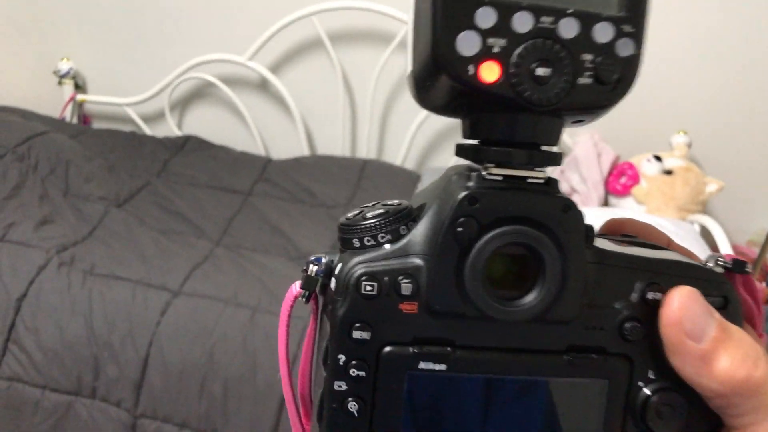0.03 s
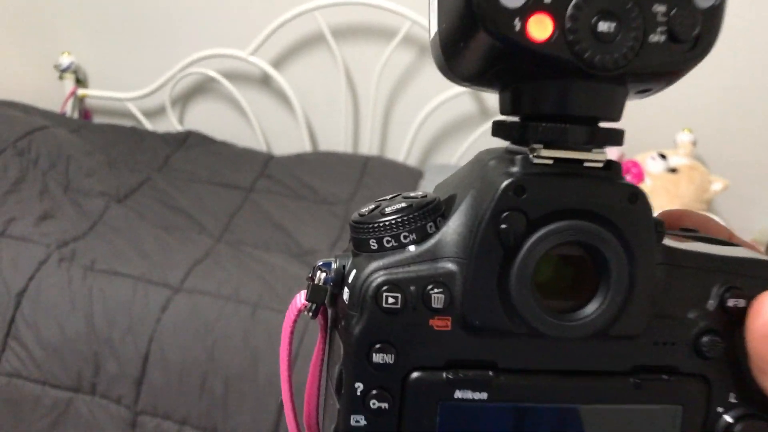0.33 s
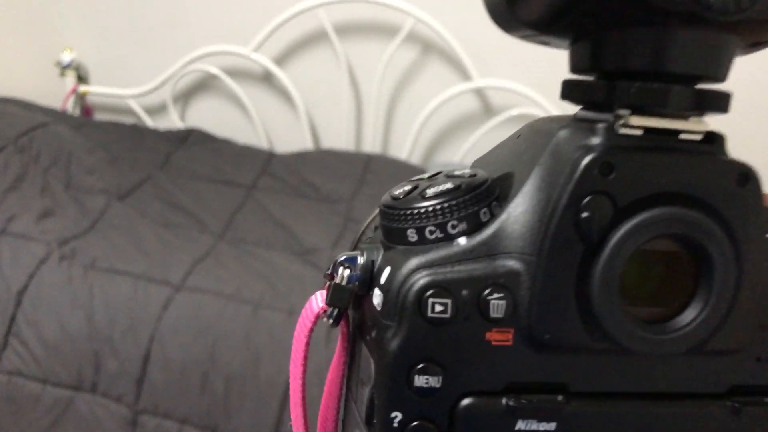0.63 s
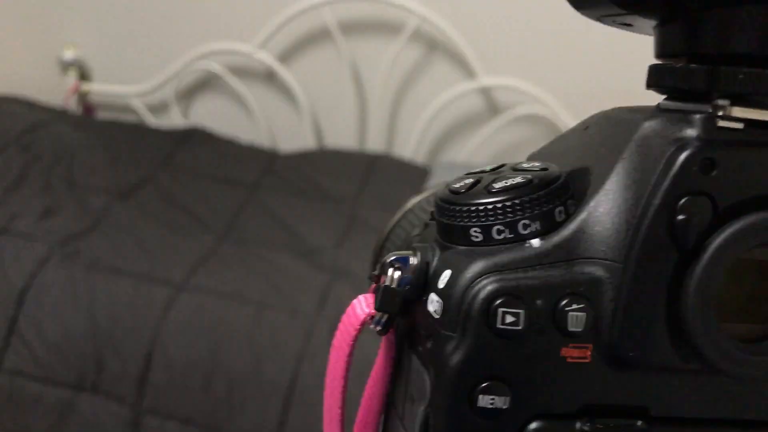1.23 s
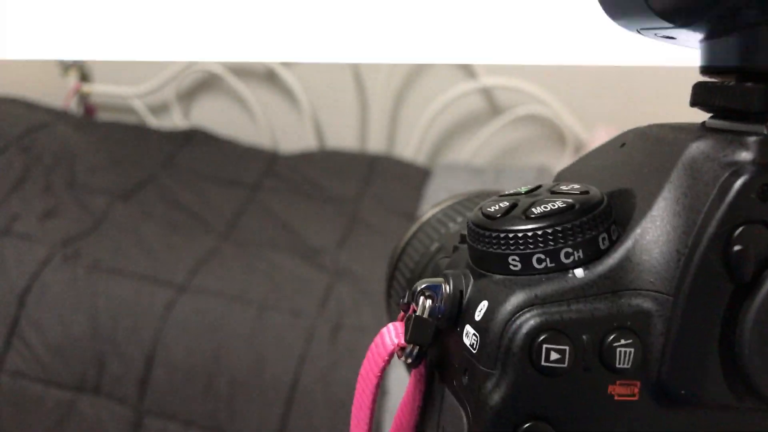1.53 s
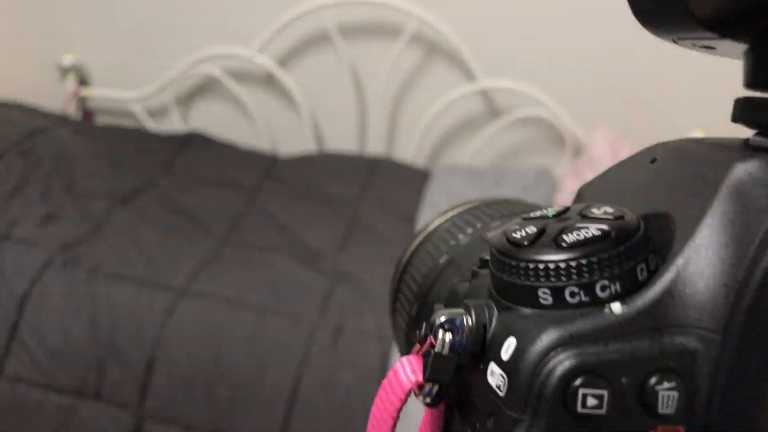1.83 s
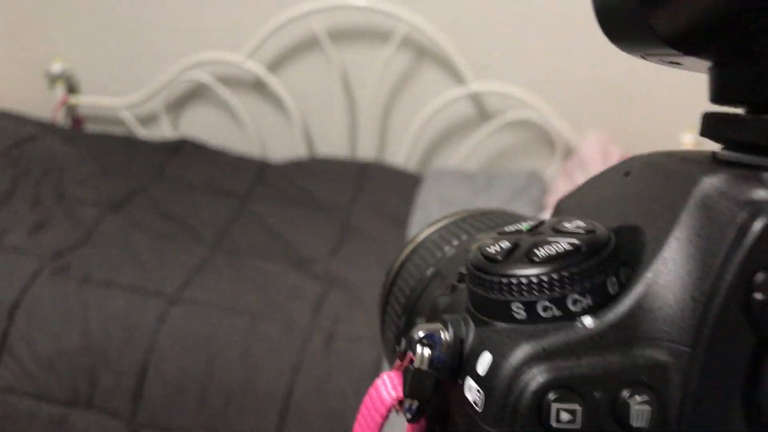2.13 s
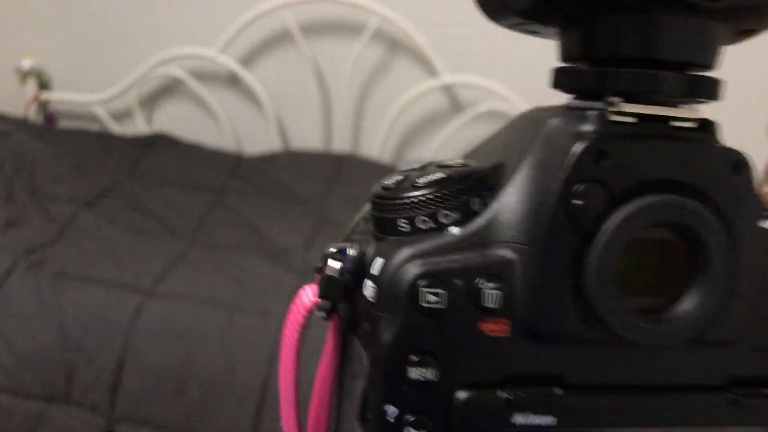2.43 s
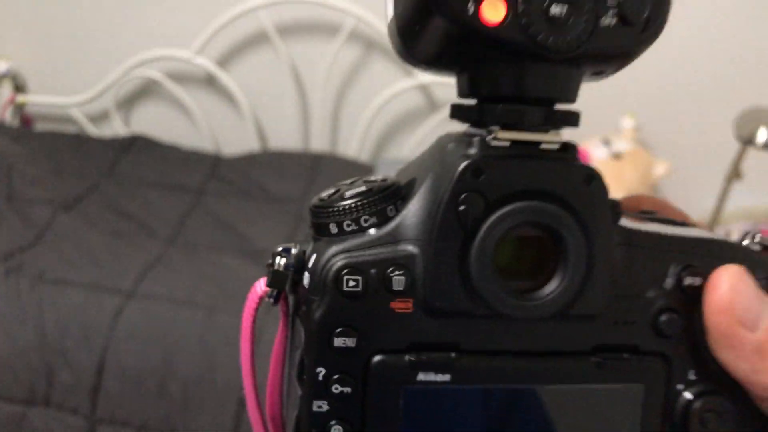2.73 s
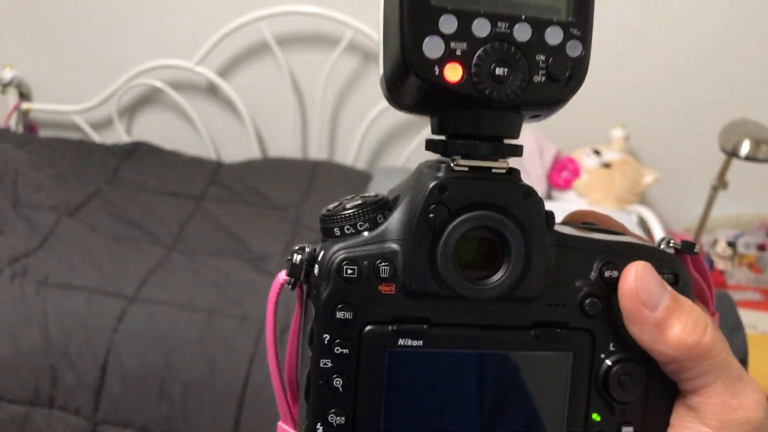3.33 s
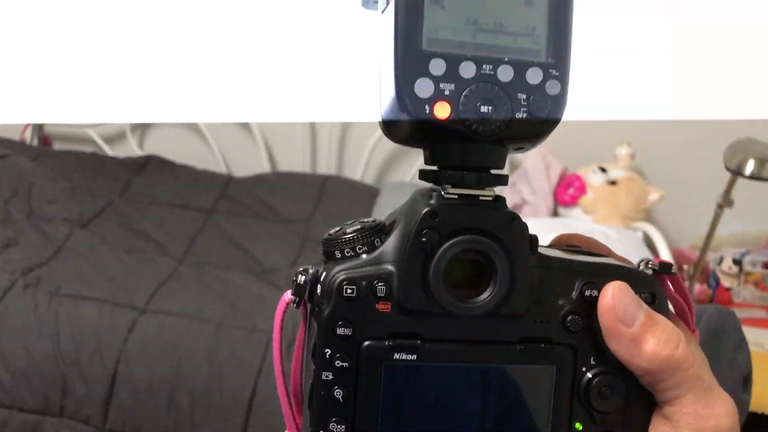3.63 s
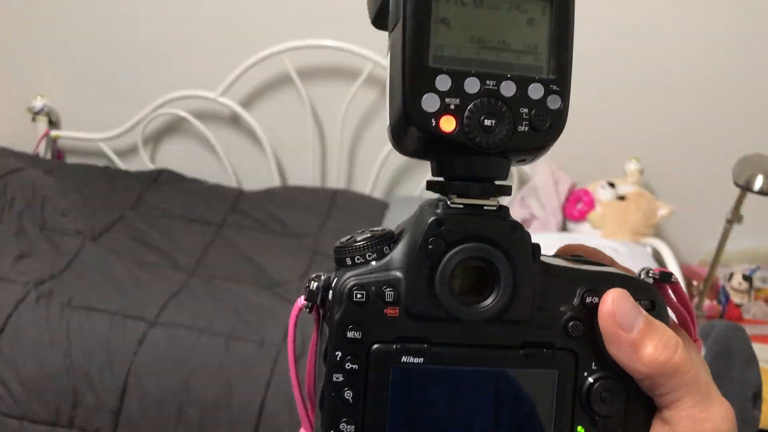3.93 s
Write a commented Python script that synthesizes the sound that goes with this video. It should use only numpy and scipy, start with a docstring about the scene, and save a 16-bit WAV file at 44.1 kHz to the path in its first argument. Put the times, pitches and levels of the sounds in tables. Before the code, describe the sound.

A camera shutter fires a rapid, even burst of sharp mechanical clacks close by.

```python
"""A reflex camera fires a burst at six frames a second, close by, in a quiet bedroom.
Every frame is the same run of contacts: release, mirror up, two shutter curtains, mirror down, then
a motor recocks the works. Each contact layers a bright crack, a short knock and a dull thud, all
coloured by the housing. The sound thins as the microphone backs away; a soft bump lands near the end.
Faint handling ticks come first, over a bed of mains hum and room hiss."""
import sys
import numpy as np
from scipy import signal
from scipy.fft import rfft, irfft
from scipy.io import wavfile

SR = 44100
rng = np.random.default_rng(int(sys.argv[2]) if len(sys.argv) > 2 else 0)


def master(y):
    """Save y as 16-bit WAV."""
    cut = np.clip(np.atleast_2d(y).T, -1, 1)
    pcm = np.round(cut * 32767)  # scale
    wavfile.write(sys.argv[1], SR, pcm.astype(np.int16))


N = 176400

# the frames of the burst: (time [s], level [dB])
BURST_FRAMES = [(0.9496, -1), (1.1115, -1), (1.2851, -1), (1.4476, -1), (1.612, -1), (1.7757, -0.5),
                (1.9396, -0.5), (2.1046, 0), (2.2769, 0), (2.4395, -0.1), (2.6127, 0.5), (2.7727, 0),
                (2.9449, 0.5), (3.1049, 0), (3.277, 0), (3.437, -0.5), (3.6088, -1), (3.7692, -1),
                (3.9404, -2.5)]
# the hits within a frame: (delay [s], crack level [dB], crack decay [s], brightness [dB/octave],
# ring pitch [Hz], ring lift [dB], knock pitch [Hz], knock level [dB])
FRAME_CONTACTS = [ (.0007, -10, 0.00116, 3, 3980, 9, 834, 0),
                  (.0137, -7.5, 0.00089, 1.1, 3380, 3, 682, -8.5),
                  (0.0151, -10.5, 0.0025, -0.5, 2320, 9.5, 995, -3),
                  (0.0212, -12, 0.00057, 6, 3200, 8.5, 952, 3.5),
                  (.0228, -10, 0.0018, -1, 3250, 13, 636, -7.5),
                  (0.0244, -11.5, 0.005, 0.5, 2100, 2, 1172, -14.5),
                  (.0280, -10, 0.0032, -2.7, 3200, 4, 899, -0.5),
                  (.0325, -18.5, 0.0042, 3.8, 2300, 24, 806, -10),
                  (0.0361, -8.5, 0.0022, 3, 3560, -1, 570, -18.5),
                  (0.0384, -10, 0.0017, -2.8, 6140, 6.5, 1012, -3.5),
                  (.0540, -13.5, 0.00069, 4, 3380, -2.5, 1265, -22),
                  (0.0558, -6, 0.0014, -1, 3460, 7, 1386, -15.5),
                  (0.0586, -4.5, 0.00174, 0.86, 5440, 5.5, 920, -5),
                  (0.0603, -8, 0.00062, -3.3, 2950, -2, 1254, -11),
                  (0.0693, -16.5, .0008, -4.9, 3520, -10, 610, -25),
                  (0.0711, -7, 0.00144, 1.5, 3420, 9, 1200, -2),
                  (0.0736, -8, 0.00124, 2.8, 2320, 7, 876, 0.5),
                  (.0855, -13, 0.00145, -3.8, 2380, 7, 667, -12.5),
                  (0.0903, -13.5, 0.0011, 3.5, 2400, -17, 908, 2),
                  (.0950, -23.5, 0.0011, -1, 3100, -8, 1174, -16),
                  (.0980, -27.5, 0.0031, -1.5, 1910, 27.5, 874, -2),
                  (.1040, -21.5, 0.0041, -10.5, 3000, -9, 927, 1),
                  (0.109, -9.5, 0.00076, 0.5, 2900, 7.5, 1000, -20),
                  (0.121, -11, 0.0015, 2, 5660, 10, 1080, -29),
                  (0.1232, -20.5, 0.0014, -2.8, 5200, 6, 1370, -35),
                  (.1330, -12.5, 0.0025, .8, 4200, 10.5, 770, -14),
                  (.1378, -35.5, 0.0015, -7.2, 2300, 29.5, 868, -15),
                  (0.1466, -15, 0.001, 1.5, 4260, 5.5, 1154, -9)]
# zing of the small springs that release and lift the mirror: (pitch [Hz], width [Hz], lift [dB])
SPRING_RINGS = [(4150, 300, 1.5), (5750, 440, 2.5), (11100, 810, 2.5), (13600, 1000, 4.5)]
# ring of the shutter blades: (pitch [Hz], width [Hz], lift [dB])
BLADE_RINGS = [(1470, 82, 7.5), (2560, 260, 7.5), (2920, 82, 2), (3200, 180, 4), (3570, 180, 6),
               (4530, 200, 4.5), (6240, 580, 3.5)]
# swell of the recocking motor and gears within a frame: (delay [s], level [dB])
MOTOR_ENVELOPE = [(.072, -58), (0.081, -38.5), (0.096, -26.5), (0.113, -35), (.14, -34), (0.151, -40)]
# broad colour of the housing: (frequency [Hz], gain [dB])
HOUSING_EQ = [(60, -27), (150, -3), (280, -4), (450, -9.5), (650, -0.5), (1200, 2), (1800, -1), (3200, -1),
              (6000, -1.5), (8000, -8), (12000, -9), (16000, -15)]
# resonances of the housing: (pitch [Hz], width [Hz], lift [dB])
HOUSING_RINGS = [(583, 41, 4.5), (685, 75, 3), (923, 22, 1.5), (1020, 12, 0.5), (1156, 65, 0.5),
                 (1370, 100, 1.5), (2360, 110, 1.5), (3156, 250, 3)]
# the microphone backs away, then comes partway back: (time [s], share of far sound [0-1])
FAR_BLEND = [(.95, 0), (2.45, 0.25), (2.8, 0.49), (3.1, 0.7), (3.5, .92), (4, 0.5)]
# change of colour at the far position: (frequency [Hz], gain [dB])
FAR_EQ = [(200, -4), (580, -4), (720, -15.5), (870, -9), (1020, -3), (1350, 3.5), (1600, -6), (2400, -2.5),
          (3400, -5.5), (6000, -6), (9000, -4.5), (15000, -10)]
# fingers on the grip: (time [s], level [dB], decay [s])
FINGER_SCUFFS = [(.003, -54.5, 0.059), (.136, -51.5, 0.0038), (.168, -60, 0.016), (.254, -52, 0.0038),
                 (.266, -51, 0.0035)]
# colour of the room hiss: (frequency [Hz], relative level [dB])
HISS_EQ = [(20, -24), (50, 3.5), (100, 2), (200, -2.5), (400, -8.5), (700, -13), (1000, -12.5),
           (2000, -18.5), (5000, -22), (7500, -22.5), (8600, -17.5), (10300, -28), (11500, -22),
           (16000, -30)]
# partials of the mains hum: (frequency [Hz], level [dB])
HUM_PARTIALS = [(120, -70), (240, -80), (600, -90), (1200, -94), (1320, -89)]

CURTAINS_FROM_S, CURTAINS_TO_S, RECOCK_FROM_S = .05, .08, .115   # within a frame
CRACK_DB, CRACK_RISE_S, CRACK_LOW_CUT_HZ = 3.5, .00026, 408
KNOCK_DB, KNOCK_RISE_S, KNOCK_T60_S = -25, .00099, .029
THUD_HZ, THUD_SPREAD_OCTAVES, THUD_VS_KNOCK_DB, THUD_T60_S = 315, .25, -16, .014
# variation from frame to frame
FRESH_CRACK_GAIN, STRENGTH_SPREAD_DB = .59, .88
KNOCK_DETUNE, RECOCK_RING_DETUNE = .018, .016   # share of pitch
SLIP_S, RECOCK_SLIP_S = .00003, .0006   # timing play: mirror and shutter, recocking

GEAR_CLICKS_PER_S, GEAR_LOW_HZ, GEAR_TOP_HZ = 5000, 330, 12000
BUMP_S, BUMP_HZ, BUMP_DB, BUMP_DECAY_S = 3.805, 62, -57, .03
EARLY_DB, EARLY_T60_S = -13, .017
TAIL_DB, TAIL_T60_S, TREBLE_T60_S, TAIL_SPLIT_HZ = -13, .25, .11, 5000
SIZE = 4096   # samples in a knock or an EQ response


def mirror_and_shutter():
    """Parts strike in turn; each keeps its own crack, knock and thud, varied a little every frame."""
    out, hz = np.zeros(N), bins(SIZE)
    octaves = np.log2(np.maximum(hz, 1000) / 3000)   # brightness pivots at 3 kHz
    low_cut = -10 * np.log10(1 + (CRACK_LOW_CUT_HZ / (hz + 50)) ** 4)
    for delay, crack_db, decay, bright, ring_hz, ring_db, knock_hz, knock_db in FRAME_CONTACTS:
        metal = SPRING_RINGS if delay < CURTAINS_FROM_S else BLADE_RINGS if delay < CURTAINS_TO_S else []
        tone_db = bright * octaves + low_cut + resonance_db(metal)
        ring_width = ring_hz / 3.2   # low Q: a contact rings only broadly
        own_crack = crack(decay)
        thud_hz = THUD_HZ * 2 ** (THUD_SPREAD_OCTAVES * (2 * rng.random() - 1))
        thud = from_db(THUD_VS_KNOCK_DB) * knock(thud_hz, THUD_T60_S)
        slip, ring_detune = (RECOCK_SLIP_S, RECOCK_RING_DETUNE) if delay > RECOCK_FROM_S else (SLIP_S, 0)
        variations = rng.standard_normal((len(BURST_FRAMES), 3))
        for (frame_s, frame_db), (late, strong, sharp) in zip(BURST_FRAMES, variations):
            start = frame_s + delay + slip * late
            gain = from_db(frame_db + STRENGTH_SPREAD_DB * strong)
            ring = resonance_db([(ring_hz * (1 + ring_detune * sharp), ring_width, ring_db)])
            chatter = unit_energy(own_crack + FRESH_CRACK_GAIN * crack(decay))
            snap = equalise(chatter, tone_db + ring)
            body = thud + knock(knock_hz * (1 + KNOCK_DETUNE * sharp), KNOCK_T60_S)
            add(out, start, gain * from_db(CRACK_DB + crack_db) * snap)
            add(out, start, gain * from_db(KNOCK_DB + knock_db) * body)
    return out


def crack(decay_s):
    """The attack: a dense, spectrally even burst of chatter as two parts meet."""
    t = np.arange(SIZE // 2) / SR
    rise = 1 - np.exp(-t / CRACK_RISE_S)
    window = np.exp(-(t / (4 * decay_s)) ** 2)
    chatter = rng.standard_normal(len(t)) * rise * np.exp(-t / decay_s)
    for _ in range(3):   # flatten the spectrum, then tighten the tail again
        spectrum = rfft(chatter)
        chatter = irfft(spectrum / (abs(spectrum) + 1e-9)) * window
    return unit_energy(chatter * rise)


def knock(hz, t60):
    """The weight: the body rings briefly and low after a contact."""
    t = np.arange(SIZE) / SR
    return np.sin(2 * np.pi * hz * t) * (1 - np.exp(-t / KNOCK_RISE_S)) * from_db(-60 * t / t60)


def motor():
    """Gear teeth rattle while the shutter is wound up again."""
    out, t = np.zeros(N), np.arange(SR // 5) / SR
    swell = from_db(np.interp(t, *np.transpose(MOTOR_ENVELOPE), left=-120, right=-120))
    for start, frame_db in BURST_FRAMES:
        teeth = rng.standard_normal(len(t)) * (rng.random(len(t)) < GEAR_CLICKS_PER_S / SR)
        add(out, start, from_db(frame_db) * swell * unit_energy(teeth) * np.sqrt(len(t)))
    rattle = pass_filter(out, "high", GEAR_LOW_HZ, order=2)
    return pass_filter(rattle, "low", GEAR_TOP_HZ)


def housing(x):
    """The shell colours the camera's sounds; they thin out as the microphone backs away."""
    hz = bins(SIZE)
    shell_db = curve_db(HOUSING_EQ, hz) + resonance_db(HOUSING_RINGS)
    near = equalise(x, shell_db)
    far = equalise(x, shell_db + curve_db(FAR_EQ, hz))
    away = np.interp(np.arange(N) / SR, *np.transpose(FAR_BLEND))
    return near * (1 - away) + far * away


def handling():
    """Short, faint scuffs of fingers on the grip."""
    out, t = np.zeros(N), np.arange(SR // 4) / SR
    for start, db, decay in FINGER_SCUFFS:
        add(out, start, from_db(db) * rng.standard_normal(len(t)) * np.exp(-t / decay))
    return pass_filter(out, "low", hz=6000)   # fingers are softer than metal


def microphone_bump():
    """A soft bump on the microphone: one low, fast-dying tone."""
    t = np.maximum(np.arange(N) / SR - BUMP_S, 0)
    return from_db(BUMP_DB) * np.sin(2 * np.pi * BUMP_HZ * t) * np.exp(-t / BUMP_DECAY_S)


def bedroom(x):
    """Quick reflections from nearby surfaces, then a short tail whose treble dies first."""
    t = np.arange(SR // 2) / SR
    early, late = rng.standard_normal((2, len(t)))
    early = unit_energy(early * (t > .002) * from_db(-60 * t / EARLY_T60_S))
    low = pass_filter(late, "low", TAIL_SPLIT_HZ)
    treble = (late - low) * from_db(-60 * t / TREBLE_T60_S)
    tail = unit_energy((t > .008) * (low * from_db(-60 * t / TAIL_T60_S) + treble))
    return convolve(x, from_db(EARLY_DB) * early + from_db(TAIL_DB) * tail)


def moving_reflections(x, spots=7):
    """The reflections shift as the hand-held microphone moves: a crossfade from spot to spot."""
    place = np.arange(N) / N * (spots - 1)
    return sum(bedroom(x * np.sqrt(np.maximum(1 - abs(place - k), 0))) for k in range(spots))


def room_tone(hiss_db=-68):
    """The bed: steady hiss and mains hum."""
    t = np.arange(N) / SR
    spectrum = rfft(rng.standard_normal(N)) * from_db(curve_db(HISS_EQ, bins(N)))
    hiss = unit_energy(irfft(spectrum, N)) * np.sqrt(N)
    hum = sum(from_db(db) * np.sqrt(2) * np.sin(2 * np.pi * (hz * t + rng.random()))
              for hz, db in HUM_PARTIALS)
    return from_db(hiss_db) * hiss + hum


def from_db(db):
    """Decibels to gain."""
    return 10 ** (np.asarray(db) / 20)


def unit_energy(x):
    """Scale to energy one."""
    return x / np.sqrt(np.sum(x ** 2) + 1e-20)


def bins(size):
    """Frequencies of a real transform."""
    return np.fft.rfftfreq(size, 1 / SR)


def curve_db(points, hz):
    """Read an EQ curve on a log-frequency axis."""
    point_hz, db = np.transpose(points)
    return np.interp(np.log(hz + 1e-3), np.log(point_hz), db)


def resonance_db(rings):
    """An EQ curve with one bell for each resonance."""
    return sum(lift / (1 + (2 * (bins(SIZE) - hz) / width) ** 2) for hz, width, lift in rings)


def equalise(x, db):
    """Minimum-phase EQ, so nothing rings ahead of a hit."""
    cepstrum = irfft(np.log(from_db(db)))
    cepstrum[1:SIZE // 2] *= 2
    cepstrum[SIZE // 2 + 1:] = 0
    return convolve(x, irfft(np.exp(rfft(cepstrum))))


def pass_filter(x, kind, hz, order=1):
    """A gentle low-pass or high-pass."""
    return signal.sosfilt(signal.butter(order, hz, kind, fs=SR, output="sos"), x + 1e-18)


def convolve(x, response):
    """Filter by an impulse response, keeping the length."""
    return signal.fftconvolve(x, response)[:len(x)]


def add(out, start_s, x):
    """Mix a sound in at a time."""
    i = min(max(int(round(start_s * SR)), 0), len(out))
    out[i:i + len(x)] += x[:len(out) - i]


def scene():
    """The mono mix: the camera up front, its room behind."""
    camera = housing(mirror_and_shutter() + motor() + handling())
    return (camera + moving_reflections(camera) + microphone_bump() + room_tone())[None]


def record(dry):
    """A steep high cut at 16 kHz."""
    return signal.sosfilt(signal.ellip(12, .1, 80, 16000, fs=SR, output="sos"), dry)


dry = scene()
out = record(dry)
master(out)
```